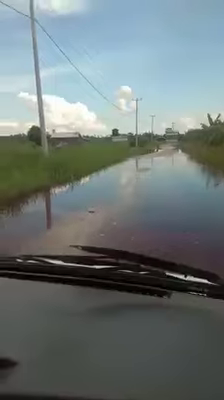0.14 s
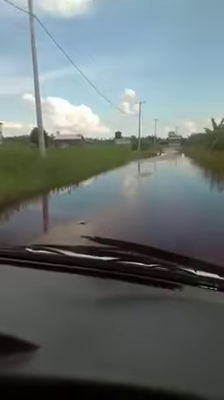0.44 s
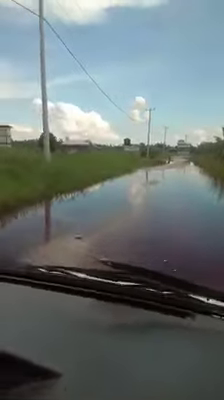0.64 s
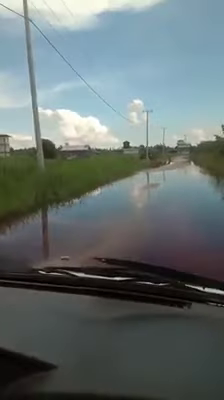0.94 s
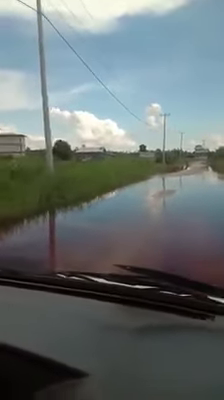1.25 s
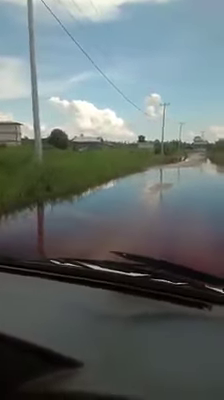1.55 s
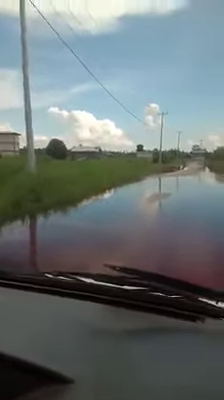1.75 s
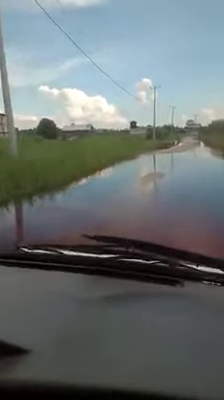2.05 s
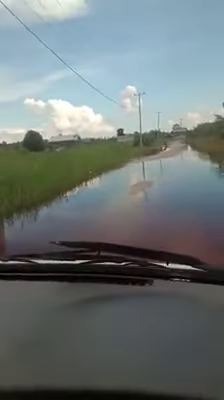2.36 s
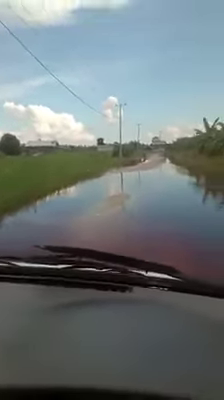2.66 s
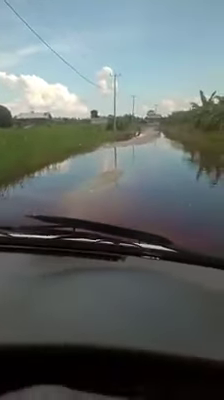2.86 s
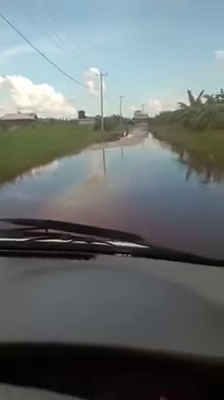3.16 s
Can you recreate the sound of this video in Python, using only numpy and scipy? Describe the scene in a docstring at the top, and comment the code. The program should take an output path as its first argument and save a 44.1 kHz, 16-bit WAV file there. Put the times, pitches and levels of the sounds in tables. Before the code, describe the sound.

Floodwater rushes along a slowly moving car, heard from inside on a handheld phone. The body rumbles, knocks and booms softly over bumps, while a flock of small birds chirps and rasps outside.

```python
"""Inside a car that creeps through floodwater, window open, heard on a phone in the hand. The body rumbles and
knocks, and the cabin booms softly as the wheels meet bumps under water. Water rushes along the sills: grainy
noise with a hollow ring. A faint high hiss flickers in the treble. A chorus of small bird calls twitters and
screeches above it all. Each call is a gliding, throbbing tone mixed with a noisy rasp; the near ones echo off
the water and verges."""
import sys
import numpy as np
from scipy import signal
from scipy.fft import rfft, irfft
from scipy.io import wavfile
from scipy.ndimage import uniform_filter1d

SR = 44100
rng = np.random.default_rng(int(sys.argv[2]) if len(sys.argv) > 2 else 0)


def transcribe(signal):
    """Save signal, clipped to [-1, 1], as a 16-bit WAV file at the path in sys.argv[1]."""
    frames = np.atleast_2d(signal).T
    limited = np.clip(frames, -1, 1)
    pcm = np.round(limited * 32767).astype(np.int16)
    wavfile.write(sys.argv[1], SR, pcm)


N = 146412


def undb(db):
    return 10 ** (np.asarray(db) / 20)


def unit(x):
    return x / np.sqrt(np.mean(np.abs(x) ** 2))


def fader(table):
    """Gain that rides a table of (time [s], level [dB])."""
    times, levels = np.array(table).T
    return undb(np.interp(np.arange(N) / SR, times, levels))


def drift(rate_hz):
    """Smooth random modulation with an RMS of 1."""
    hold = int(SR / rate_hz)
    steps = np.repeat(rng.standard_normal(N // hold + 1), hold)
    return unit(uniform_filter1d(uniform_filter1d(steps, hold), hold)[:N])


def noise_bed(spectrum, flicker_db, flicker_hz, grain_db):
    """Third-octave bands of grainy noise that follow a spectrum, each flickering on its own."""
    hz, db = np.array(spectrum, float).T
    f = np.fft.rfftfreq(N, 1 / SR) + 1
    colour = undb(np.interp(np.log(f), np.log(hz), db, left=-90, right=-90))
    out = np.zeros(N)
    for octave in np.arange(np.log2(hz[0]), np.log2(hz[-1]) + 1 / 3, 1 / 3):
        band = np.cos(np.pi / 2 * np.clip(3 * (np.log2(f) - octave), -1, 1))
        grain = rng.standard_normal(N) * undb(grain_db * drift(300))
        out += undb(flicker_db * drift(flicker_hz)) * irfft(rfft(grain) * colour * band, N)
    return unit(out)


def resonant_noise(hz, width_hz):
    """Noise focused around one resonant peak."""
    f = np.fft.rfftfreq(N, 1 / SR)
    return unit(irfft(rfft(rng.standard_normal(N)) / (1 + (2 * (f - hz) / width_hz) ** 2), N))


# Tone of the high hiss (frequency [Hz], relative level [dB])
HIGH_HISS_SPECTRUM = [(10000, -4.5), (12100, -4), (14400, 4.5), (16000, -1)]
# Fader ride of the high hiss (time [s], level [dB])
HIGH_HISS_RIDE = [(.2, -85), (.42, -62), (.76, -55), (.84, -71), (1.32, -77), (1.4, -60), (2.0, -55.5),
                  (3.04, -54), (3.065, -44), (3.08, -54), (3.32, -58)]

def high_hiss():
    """A faint, flickering hiss at 10-16 kHz."""
    hiss = noise_bed(HIGH_HISS_SPECTRUM, flicker_db=1.5, flicker_hz=13, grain_db=1.5)
    return hiss * fader(HIGH_HISS_RIDE)


# Bass-heavy tone of the car body (frequency [Hz], relative level [dB])
RUMBLE_SPECTRUM = [(22, -38), (33, -20), (45, -4), (95, -1), (150, -7), (300, -15.5), (600, -26.5)]
# Fader ride of the rumble (time [s], level [dB])
RUMBLE_RIDE = [(.2, -29), (.47, -29), (.56, -24), (.62, -27), (.8, -25.5), (1.2, -26.5), (2.4, -27.5),
               (3.32, -30)]

def body_rumble():
    """The body of the creeping car lays down a low, wavering bed."""
    return noise_bed(RUMBLE_SPECTRUM, flicker_db=1.96, flicker_hz=7.67, grain_db=1.0) * fader(RUMBLE_RIDE)


# Dull hits in the car body (time [s], peak level [dB], pitch [Hz])
KNOCK_HITS = [(0.472, -20.5, 407), (1.185, -19.5, 398), (2.755, -22, 297)]

def body_knocks(t60_s=0.078):
    """The body knocks: a damped note with a slap of noise."""
    out = np.zeros(N)
    slap = resonant_noise(hz=280, width_hz=530)
    for start, db, hz in KNOCK_HITS:
        age = np.maximum(np.arange(N) / SR - start, 0)
        note = np.sin(2 * np.pi * hz * age)
        out += undb(db - 60 * age / t60_s) * (note + 0.49 * slap * (age > 0))
    return out


# Soft low swells in the cabin (centre time [s], peak level [dB], pitch [Hz])
BOOM_SWELLS = [(.545, -21.5, 179), (1.1, -19.5, 87.4), (1.261, -23, 103), (1.31, -23.5, 168),
               (1.35, -21.5, 102), (1.555, -21.5, 102), (2.4, -21.5, 95.4), (3.151, -23.5, 176.3)]

def cabin_booms(swell_s=0.021):
    """The cabin booms as the wheels meet bumps under water: low sines in bell-shaped swells."""
    out = np.zeros(N)
    for centre, db, hz in BOOM_SWELLS:
        t = np.arange(N) / SR - centre
        out += undb(db) * np.exp(-.5 * (t / swell_s) ** 2) * np.sin(2 * np.pi * hz * t)
    return out


# Tone of the broad rush (frequency [Hz], relative level [dB])
RUSH_SPECTRUM = [(150, -3), (400, -5.5), (800, -6), (1800, -9.5), (7300, -15), (8300, -28), (10300, -38),
                 (11300, -71)]
# Fader rides of the rush and its ring (time [s], level [dB])
RUSH_RIDE = [(.2, -35), (.6, -32.5), (2.2, -30), (3.32, -32)]
RING_RIDE = [(.2, -47), (.5, -52), (.68, -36.5), (1.5, -38.5), (3.32, -39.5)]

def floodwater():
    """Water rushes along the sills, with a hollow ring in the mids."""
    rush = noise_bed(RUSH_SPECTRUM, flicker_db=3.0, flicker_hz=12, grain_db=1.5) * fader(RUSH_RIDE)
    ring = resonant_noise(hz=1245, width_hz=155) * undb(2 * drift(14)) * fader(RING_RIDE)
    return rush + ring


WHISTLE_WIDTH_HZ, SCREECH_WIDTH_HZ = 160, 520

def bird_calls(calls, edge_s=0.005, throb_hz=200.2, throb_depth=0.78):
    """Gliding whistles that throb; the wider a call's rasp, the more noise replaces its clear tone."""
    out = np.zeros(N)
    f = np.fft.fftfreq(2 ** 12, 1 / SR)
    for start, length, first_hz, last_hz, db, width_hz in calls:
        onset = int(start * SR)
        t = np.arange(max(min(int(length * SR), N - onset), 0)) / SR
        envelope = np.clip(np.minimum(t, length - t) / min(edge_s, length / 2), 0, 1)
        noise = rng.standard_normal(len(f)) + 1j * rng.standard_normal(len(f))
        rasp = np.resize(unit(np.fft.ifft(noise / (1 + (2 * f / width_hz) ** 2))), len(t))
        detune = undb(noise[0].real)  # each call throbs at its own rate
        throb = 1 + throb_depth * np.sin(2 * np.pi * throb_hz * detune * t)
        clarity = (220 / width_hz) ** 2  # tone and rasp weigh the same at a width of 220 Hz
        timbre = (clarity * throb + rasp) / np.hypot(clarity, 1)
        hz = first_hz + (last_hz - first_hz) * t / length
        glide = np.exp(2j * np.pi * np.cumsum(hz) / SR)
        out[onset:onset + len(t)] += np.real(timbre * glide) * envelope * undb(db)
    return out


# Bands where the far flock is strongest (centre [Hz], width [Hz], relative level [dB])
FLOCK_BANDS = [(2372, 1200, -8.5), (2615, 380, -0.5), (3375, 610, 4), (4200, 580, 4.5), (5910, 1500, 5.5),
               (6240, 355, -0.5), (7365, 630, -1)]
# Fader ride of the far flock (time [s], level [dB])
FLOCK_RIDE = [(.2, -39.5), (.33, -33.5), (.43, -30.5), (.49, -65), (.56, -31.5), (.8, -28.5), (1.2, -30.5),
              (1.67, -35.5), (1.76, -32), (2.0, -30), (2.04, -36), (2.35, -34.5), (2.45, -32), (2.62, -37),
              (2.75, -32), (3.32, -31)]

def far_flock(twitter_count=260, mean_length_s=0.0383):
    """Distant voices merge into a shimmering blur, dotted with short, mostly falling twitters."""
    blur = unit(sum(undb(db + 2.0 * drift(13)) * resonant_noise(hz, width)
                    for hz, width, db in FLOCK_BANDS))
    twitters = []
    for when, band, pitch, stretch, fall in rng.random((twitter_count, 5)):
        centre_hz, width_hz, db = FLOCK_BANDS[int(band * len(FLOCK_BANDS))]
        hz = centre_hz + 2 * width_hz * (pitch - .5)
        fall_hz = 439 * (2 * fall - .5)
        length = mean_length_s * (.5 + stretch)
        twitters.append((when * N / SR, length, hz, hz - fall_hz, db - 6.5, WHISTLE_WIDTH_HZ))
    return (blur + bird_calls(twitters)) * fader(FLOCK_RIDE)


def roadside_echo(sound, t60_s=0.22, send_db=-3):
    """Reflections off the water and verges: a short, diffuse tail."""
    t = np.arange(SR // 2) / SR
    tail = rng.standard_normal(len(t)) * undb(-60 * t / t60_s)
    return undb(send_db) * signal.fftconvolve(sound, tail / np.sqrt(np.sum(tail ** 2)))[:N]


# Thin gliding whistles (time [s], length [s], start pitch [Hz], end pitch [Hz], level [dB])
WHISTLE_CUES = [(.142, .27, 7350, 7600, -37), (.535, .2, 7250, 6900, -37), (1.01, .075, 6450, 6350, -33),
                (.99, .15, 7050, 7250, -35), (1.2, .042, 6400, 5800, -30), (1.252, .04, 6200, 3800, -23),
                (1.243, .04, 3350, 2250, -25), (1.36, .12, 6550, 6800, -35), (1.35, .3, 2650, 2750, -35),
                (1.47, .07, 5450, 5050, -34), (1.54, .06, 5150, 5350, -35), (1.72, .28, 2500, 2650, -36),
                (2.765, .085, 5000, 5250, -31), (2.725, .07, 3800, 3750, -31), (2.9, .1, 5300, 5280, -31),
                (3.16, .055, 5100, 5320, -31), (3.203, .058, 3780, 3810, -26)]
# Rasping screeches (time [s], length [s], centre pitch [Hz], level [dB])
SCREECH_CUES = [(0.291, 0.13, 3208, -28.5), (.535, 0.026, 1305, -28.5), (0.63, 0.12, 3280, -28.5),
                (0.841, 0.023, 3420, -22.5), (0.914, 0.056, 3410, -19.5), (0.911, 0.19, 5800, -28),
                (0.995, 0.208, 4097, -27), (1.277, 0.0825, 4180, -21), (1.371, 0.044, 3416, -22.5),
                (1.437, 0.18, 3416, -26.5), (1.444, 0.086, 4190, -24.5), (1.613, 0.037, 4300, -25.5),
                (1.782, 0.14, 4354, -30), (1.875, 0.13, 5360, -29.5), (2.077, 0.089, 3590, -28),
                (2.382, 0.2, 6260, -32), (2.853, 0.091, 5550, -26.5), (2.914, 0.28, 2754, -31.5),
                (2.943, 0.19, 6160, -32), (3.101, 0.03, 3815, -22)]
# One lower voice that calls at a steady beat
BEAT_START_S, BEAT_PERIOD_S, BEAT_LENGTH_S = 1.45, .244, 0.0682
BEAT_GLIDE_HZ, BEAT_DB, BEAT_WIDTH_HZ = (2254, 2108), -35.5, 420

def near_birds(sag_hz=180):
    """Birds up front, with their echo: one steady caller, whistles, and screeches that sag in pitch."""
    beat = [(BEAT_START_S + k * BEAT_PERIOD_S, BEAT_LENGTH_S, *BEAT_GLIDE_HZ, BEAT_DB, BEAT_WIDTH_HZ)
            for k in range(8)]
    whistles = [(*cue, WHISTLE_WIDTH_HZ) for cue in WHISTLE_CUES]
    screeches = [(start, length, hz + sag_hz / 2, hz - sag_hz / 2, db, SCREECH_WIDTH_HZ)
                 for start, length, hz, db in SCREECH_CUES]
    direct = bird_calls(beat + whistles + screeches)
    return direct + roadside_echo(direct)


def scene():
    """Mono mix of birds over car, water and hiss."""
    birds = near_birds() + far_flock()
    car = body_rumble() + body_knocks() + cabin_booms()
    return (birds + car + floodwater() + high_hiss())[None]


def record(dry):
    """The phone opens after a short silence, fades up and cuts the top."""
    silence_s, fade_s, cutoff_hz = 0.14, 0.075, 15680
    t = np.arange(N) / SR - silence_s
    fade_in = np.where(t > 0, 1 - 0.73 * np.exp(-np.maximum(t, 0) / fade_s), 0)
    high_cut = signal.ellip(14, .2, 70, cutoff_hz, fs=SR, output="sos")
    return signal.sosfilt(high_cut, dry * fade_in)


dry = scene()
out = record(dry)
transcribe(out)
```